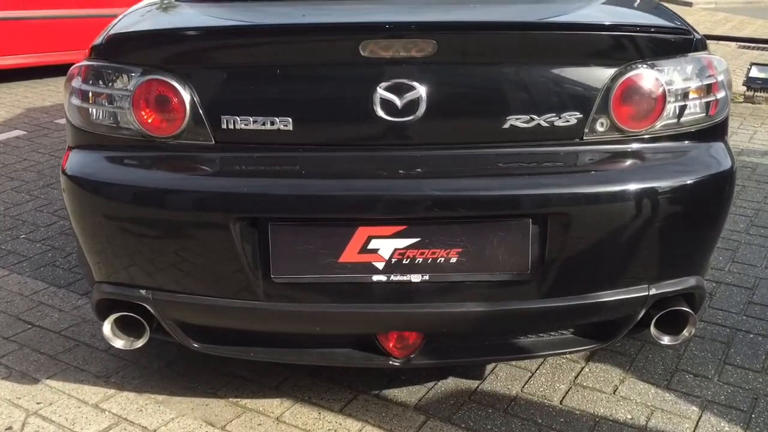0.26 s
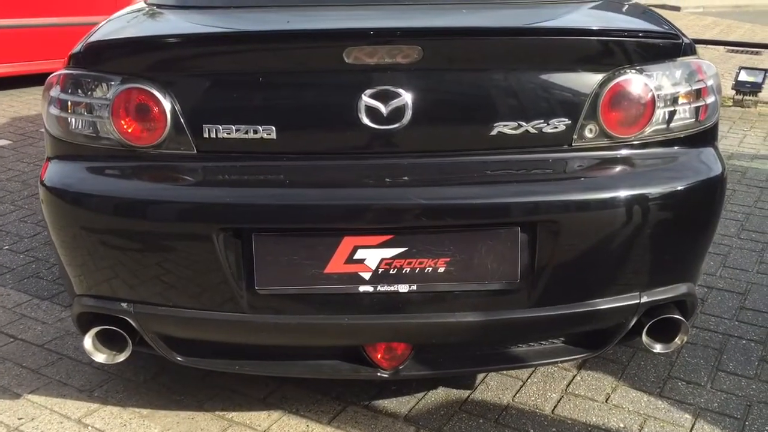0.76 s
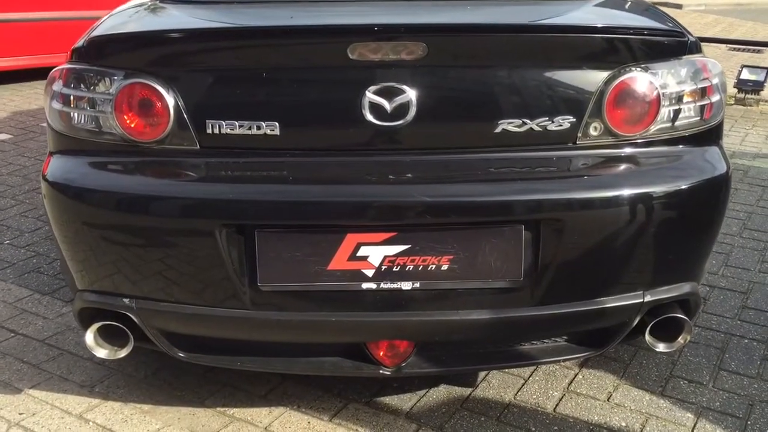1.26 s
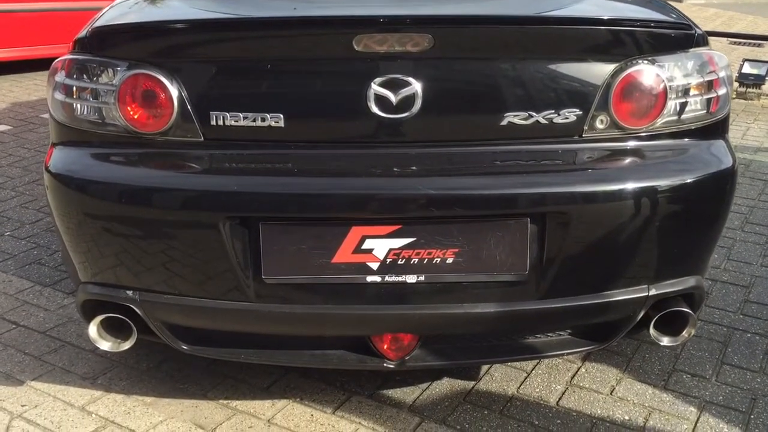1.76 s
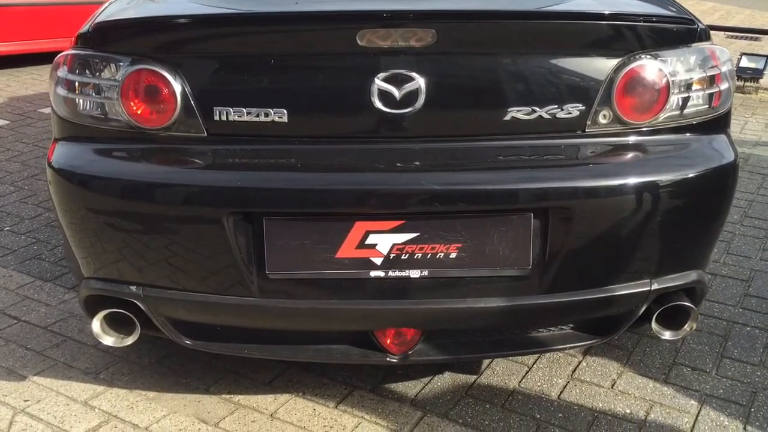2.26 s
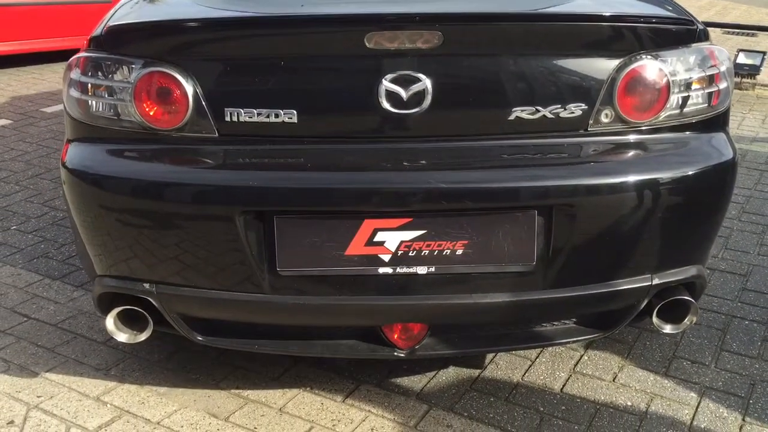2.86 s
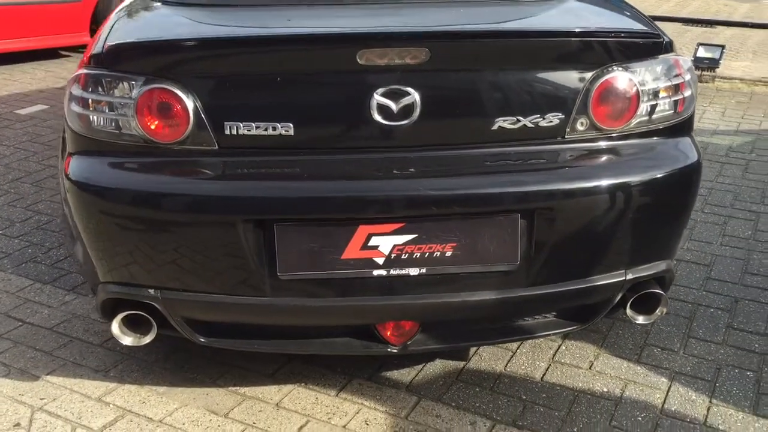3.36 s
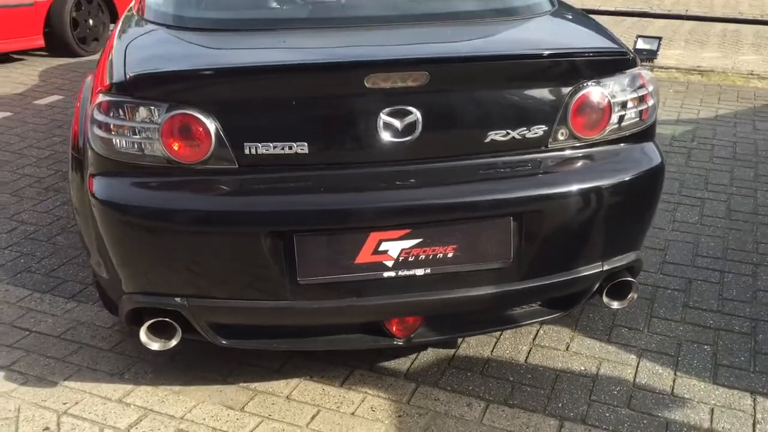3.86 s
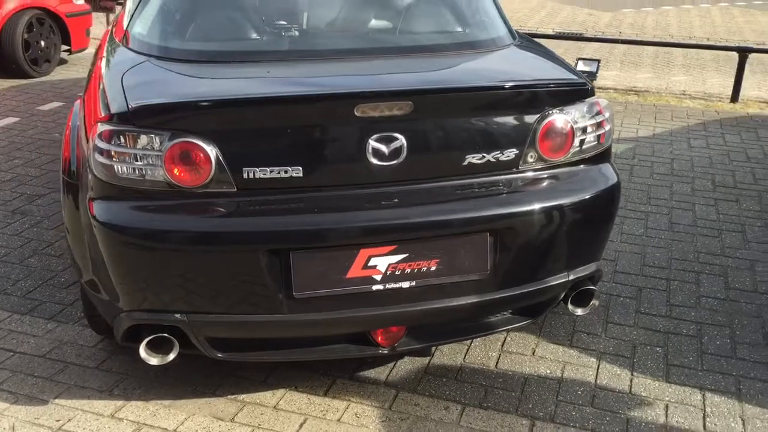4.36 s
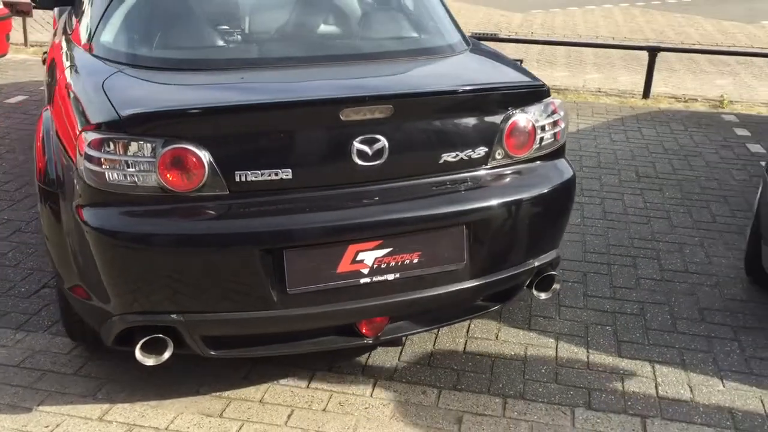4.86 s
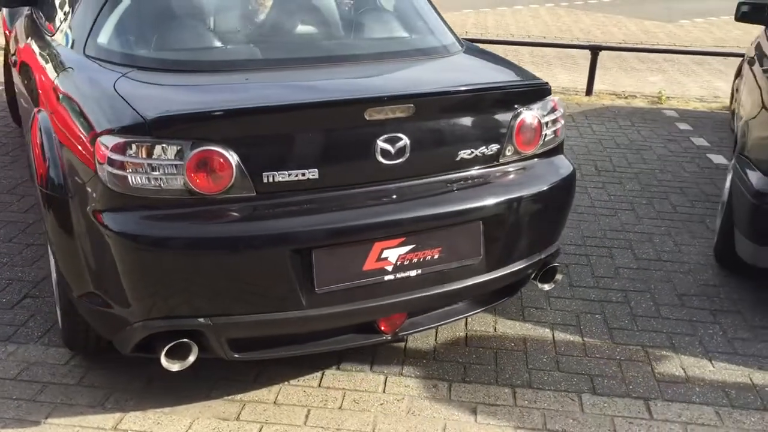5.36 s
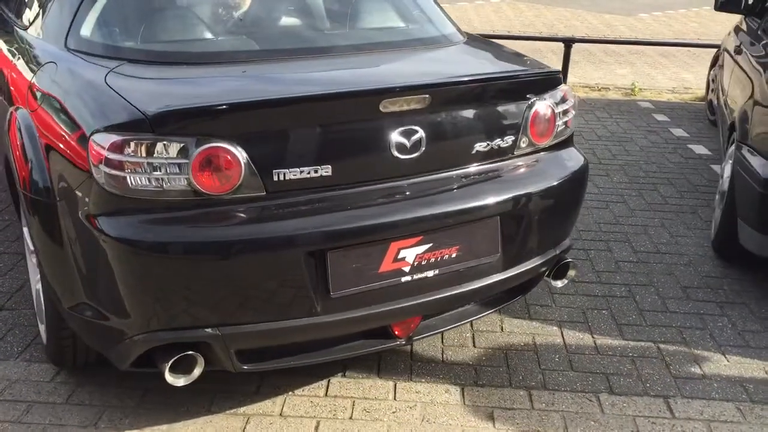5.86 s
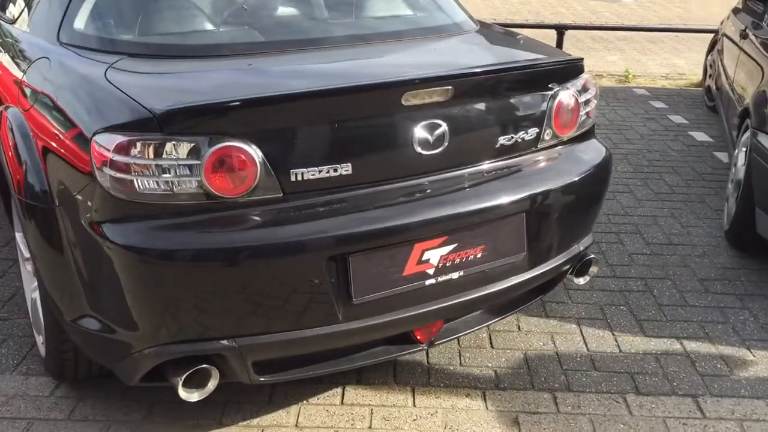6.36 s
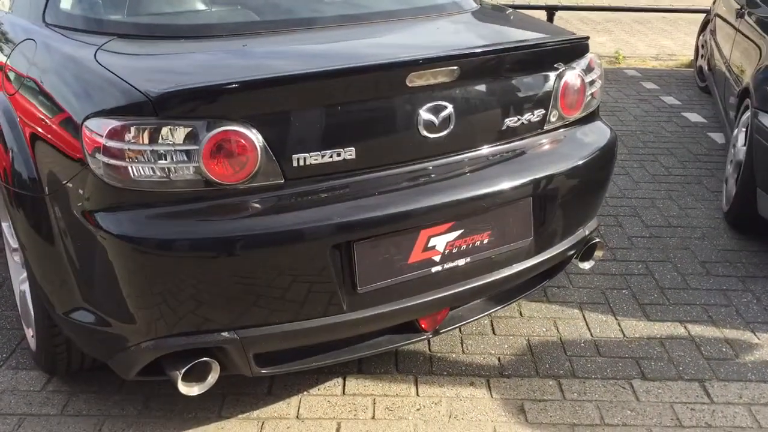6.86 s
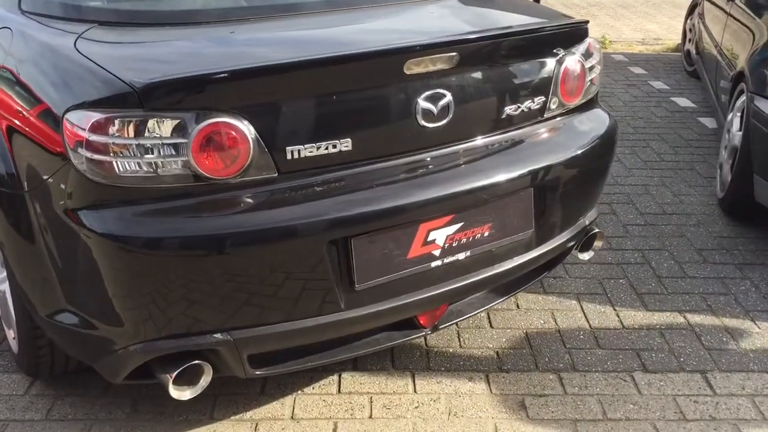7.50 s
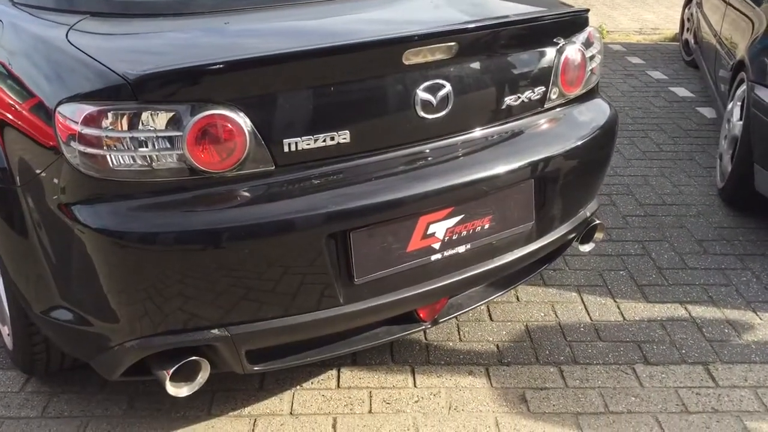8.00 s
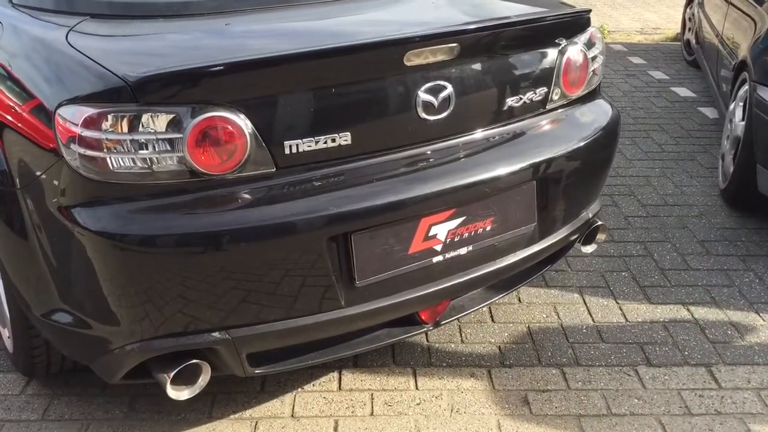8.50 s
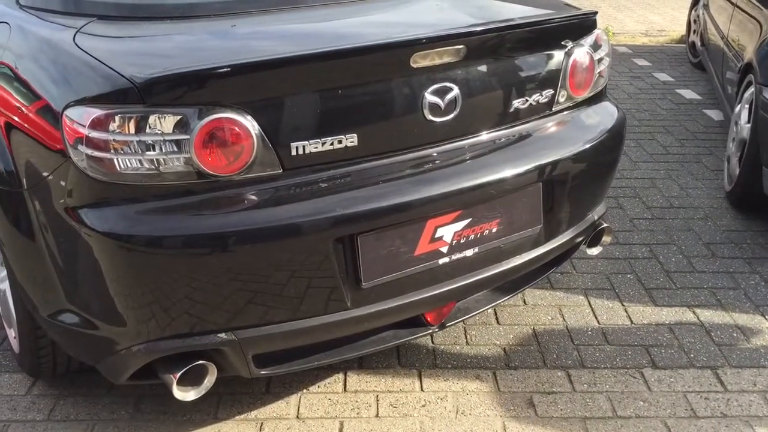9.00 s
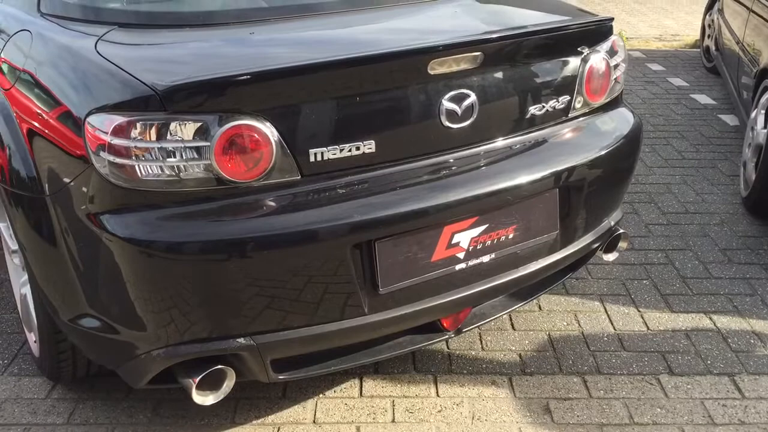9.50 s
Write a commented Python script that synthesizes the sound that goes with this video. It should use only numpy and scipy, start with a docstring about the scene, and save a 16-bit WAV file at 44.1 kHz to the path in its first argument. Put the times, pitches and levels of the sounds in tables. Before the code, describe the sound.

A rotary car engine on an open paved lot, heard dry and near the exhaust as the microphone moves around the tail. Revs drop, then jump twice in quick succession, popping at the lift-offs. The note slides down to a throbbing, uneven idle with mechanical whir and ticking, rises again more gradually to a raspy peak, drops, and is cut off on one last sharp blip.

```python
"""Two-rotor car engine behind the tailpipes

In the open, revs fall, two throttle blips lead to a long coast down to a lumpy idle, then a slow rev
and a last stab. Sine waves at multiples of the firing rate boom in the pipe; clicks through pipe
resonances thump and bark; unburnt fuel pops as ringing bursts; shaped noise and wavering tones make the
engine bay rumble, whir, hiss and tick. A few dry ticks and a faint hiss of open air complete it."""
import sys
import numpy as np
from scipy import signal
from scipy.fft import rfft, irfft, next_fast_len
from scipy.io import wavfile
from scipy.ndimage import uniform_filter1d

SR = 44100
rng = np.random.default_rng(int(sys.argv[2]) if len(sys.argv) > 2 else 0)


def transcribe(u):
    """Save the signal u as a 16-bit wav file named by the first command-line argument.

    u: samples, shape (n,) or (channels, n), limited to [-1, 1]; the rate is SR.
    q: integer samples, one column per channel.
    """
    v = np.clip(np.atleast_2d(u).T, -1, 1)
    q = np.round(v * 32767).astype(np.int16)
    wavfile.write(sys.argv[1], SR, q)


def level_to_linear(level):
    """Convert decibel levels to linear amplitude factors, elementwise."""
    exponent = np.asarray(level, float) / 20
    return 10 ** exponent


N = 429513  # length in samples

# Resonances of the silencer. Each row: pitch in Hz, width in Hz, strength in dB.
SILENCER = [(65, 62, -2.5), (119, 99, 1), (165.3, 16, 5.5), (262, 54, -9.5), (363, 110, -13)]
# Lower resonances of the tailpipe. Each row: pitch in Hz, width in Hz, strength in dB.
TAILPIPE_BODY = [(386, 24, 5), (523, 55, -4), (590, 33, -8.5)]
# Upper resonances of the tailpipe. Each row: pitch in Hz, width in Hz, strength in dB.
TAILPIPE_EDGE = [(680, 370, 17), (925, 200, 6), (1020, 540, -14.5)]
# Silencer and tailpipe against engine speed. Each row: firings per second, thump in dB with the throttle
# shut, thump open, gas rush in dB shut, gas rush open, bark body in dB open, bark edge in dB open.
BY_SPEED = [(30.3, -43, -30, -47, -36, -43, -38), (43, -34.5, 2, -44, -26, -41.5, -57),
            (52.7, -63, -21, -39, -11, -38, -40), (75.4, -43, -36, -55.5, -15.5, -34.5, -37),
            (101, -62, -56, -48, -29.5, -32, -32), (124, -64, -58, -42.5, -50, -27, -24),
            (150, -46, -46, -47.5, -31, -38, -25), (182, -73, -54, -41.5, -31.5, -33, -28.5),
            (205, -54, -48, -40.5, -44, -39, -27.5)]


def evened(x):
    """Scales a sound to rms 1."""
    return x / np.sqrt(np.mean(x ** 2) + 1e-20)


def columns(rows, at=None):
    """Reads each column of a table over time, or over the log of a speed or pitch."""
    start, *rest = np.transpose(rows)
    if at is None:
        at = np.arange(N) / SR
    else:
        start, at = np.log(start), np.log(at)
    return [np.interp(at, start, column) for column in rest]


def read(points, hz):
    """Reads a two-column table on a log axis of pitch or rate."""
    f, value = np.transpose(points)
    return np.interp(np.log(hz + 1), np.log(f + 1), value)


def blend(shut_db, open_db, throttle):
    """A level between the shut and the open throttle."""
    return shut_db + throttle * (open_db - shut_db)


def band(x, lo_hz, hi_hz):
    """Steep filter that keeps the pitches between two limits."""
    limits = [lo_hz, min(hi_hz, .49 * SR)]
    return signal.sosfilt(signal.butter(4, limits, "band", fs=SR, output="sos"), x)


def ring(modes, lo_hz, hi_hz, size=5000):
    """How a pipe with these resonances answers one click: dying sine waves in a pass band, peak 1."""
    t = np.arange(size) / SR
    waves = sum(level_to_linear(db) * w * np.exp(-np.pi * w * t) * np.sin(2 * np.pi * hz * t) for hz, w, db in modes)
    x = band(waves, lo_hz, hi_hz)
    return x / abs(x).max()


def firings(turns, spread_db, weak_db):
    """One click at each whole firing turn, of random size, with weak_db added to every second one."""
    at = np.flatnonzero(np.diff(np.floor(turns)) > 0)
    # a firing between two samples is shared between them
    late = (np.floor(turns[at + 1]) - turns[at]) / (turns[at + 1] - turns[at])
    chance = np.clip(rng.standard_normal(3000)[:len(at)], -2, 2)
    size = level_to_linear(spread_db * chance + weak_db * (np.floor(turns[at]) % 2))
    out = np.zeros(N)
    out[at], out[at + 1] = size * (1 - late), size * late
    return out


def pulses(turns, rate, spread_db, weak_db, pipe):
    """Firing clicks through a pipe, evened so that faster firing is not louder, rms 1 overall."""
    clicks = firings(turns, spread_db, weak_db)
    return evened(signal.oaconvolve(clicks, pipe)[:N] / np.sqrt(rate))


def boom(rate, turns, throttle):
    """Gas pulses in the pipe: clean sine waves at multiples (orders) of the firing rate."""
    # Each row: multiple of the firing rate, phase in turns.
    orders = [(.5, .1), (1, 0), (2, .45), (2.5, .3), (3, .1), (4, .7), (1.5, .2), (5, .35), (6, 0), (7, .6),
              (3.5, .8), (4.5, .55)]
    # Share of each order in the gas pulse, in dB.
    order_db = (-30.5, 0.53, -2.5, -22.5, -4.5, -9, -30, -12.5, -11.5, -15.5, -21.5, -14.5)
    # Change of those shares at idle, in dB.
    order_idle_db = (2, -8, 4, 8.5, -0.2, -2.7, 23, 3.5, -2.5, -3, -8, -7.5)
    # How far each order wavers, some ten times a second, in dB.
    order_flutter_db = (2.5, .9, 2, 3, 2.5, 2.5, 3, 2.5, 2.5, 2.5, 3, 3)
    # Strength of the gas pulses; it sinks at idle and dips at lift-off. Each row: time in seconds, dB.
    gas = [(0, 4.5), (.6, -5), (.65, -8), (.84, -5.5), (.9, -9), (.97, 1), (1.57, 0.5), (1.62, -6),
           (1.66, -4.5), (1.98, -4.5), (2.1, 4.5), (2.19, -2), (2.27, 0), (2.31, 1), (2.55, -0.5),
           (2.72, -.5), (3.7, 0.8), (4.6, -2), (4.7, -13), (4.9, -21.5), (6.45, -17), (6.66, -3), (6.8, -2),
           (7.1, -7), (7.5, 1.8), (8.25, -0.5), (8.3, -12.5), (8.37, -1), (8.48, 1), (9, 0.5), (9.63, 0),
           (9.685, -1.5), (9.71, 9.5), (9.74, -4)]
    # What the pipe lets out. Each row: pitch in Hz, dB with the throttle shut, dB with it open.
    pipe = [(15, -46, -39), (33, -37, -36), (42.3, -20, -21.5), (53.3, -21, -13), (65.6, -23, -13),
            (71.5, -26.5, -22), (93.5, -17.5, -13.5), (99, -16, -13), (108.7, -21, -14.5), (146, -21, -13),
            (169.8, -19.5, -16), (180.4, -26.5, -11.5), (210.6, -34, -23.5), (250, -41.5, -21.5),
            (387, -43, -25), (445, -45.5, -26.5), (520, -51, -20), (617, -48.5, -23.5), (740, -52.5, -27.5),
            (960, -60, -26), (1190, -60, -38), (1400, -66, -48.5)]
    # Levels as the microphone walks round the tail. Each row: time in seconds, whole orders above the
    # first in dB, half orders in dB.
    overtones = [(0, -3.5, -3), (.5, 0.2, -5), (.9, 2.3, -2), (.97, 3.5, 5), (1.05, 2.5, 2.5),
                 (1.2, 0.6, 6), (1.35, -1.5, 3), (1.6, -1.7, 6), (2, 4, 7.5), (2.2, -2.5, 6.5),
                 (2.5, -7.5, -3), (2.9, 4, 10), (3.5, -1.5, 0), (4, 0.3, -5), (4.6, -2.9, 2.5),
                 (6.6, -0.5, -2), (7.2, 3, 10.5), (7.5, -4, -1), (7.8, 7, 12), (8.2, 1.5, 5.5),
                 (8.6, -3, 1.5), (9.1, -6, .4), (9.6, -7.5, -6), (9.74, -3, 12)]
    gas_db, = columns(gas)
    upper_db, half_db = columns(overtones)
    idle = np.clip((44.5 - rate) / 3, 0, 1)  # sets in below 44.5 firings per second, full 3 lower
    slow = rng.standard_normal((len(orders), N // 50 + 1))  # one value per 50 samples
    slow = uniform_filter1d(uniform_filter1d(slow, size=30), size=30)
    out = np.zeros(N)
    for (k, phase), db, idle_db, flutter_db, v in zip(orders, order_db, order_idle_db, order_flutter_db, slow):
        sway = np.interp(np.arange(N) / 50, np.arange(len(v)), evened(v))
        walk_db = half_db if k % 1 else upper_db * (k > 1)
        pipe_db = blend(*columns(pipe, k * rate), throttle)
        level_db = pipe_db + gas_db + db + idle_db * idle + walk_db + flutter_db * sway
        out += np.sqrt(2) * level_to_linear(level_db) * np.cos(2 * np.pi * (k * turns + phase))
    # at idle all orders lope together
    lope = evened(uniform_filter1d(uniform_filter1d(rng.standard_normal(N), size=900), size=500))
    return out * level_to_linear(2.5 * idle * lope)


def thump_and_rush(rate, turns, throttle):
    """Silencer: uneven firing clicks make it thump, steady noise through it is the rush of gas."""
    thump_shut, thump_open, rush_shut, rush_open, _, _ = columns(BY_SPEED, rate)
    thump = pulses(turns, rate, 3.2, -0.46, ring(SILENCER, 39, 219))
    rush = evened(signal.oaconvolve(rng.standard_normal(N), ring(SILENCER, 72.6, 383))[:N])
    thump = level_to_linear(blend(thump_shut, thump_open, throttle)) * thump
    return thump + level_to_linear(blend(rush_shut, rush_open, throttle)) * rush


def bark(rate, turns, throttle):
    """Open throttle: sharp firing pulses ring the tailpipe, one rotor louder than the other."""
    # The two colours lead in turn. Each row: time in seconds, body in dB, edge in dB.
    bark_levels = [(0, .4, 2), (.95, -3, -4), (1.05, -8, 3), (1.18, -13, 6), (1.32, 1, 3.5),
                   (1.42, -6, -1.5), (1.55, 0, -2), (2.04, -8, 3), (2.12, 1, 5), (2.26, -2, 1.5),
                   (3, -5, -1.5), (6.6, -4, 1), (7.1, 14, -2), (7.35, 16.5, -5), (7.6, 4, 8), (7.8, 9, 6),
                   (7.95, 10, 0.5), (8.22, 13, 5), (9, -7, 7), (9.74, 9, 10)]
    body_db, edge_db = columns(bark_levels)
    *_, body_open, edge_open = columns(BY_SPEED, rate)
    early = turns + .3  # firing turns ahead of the thump
    body = pulses(early, rate, .8, -6, ring(TAILPIPE_BODY, 240, 1000))
    edge = pulses(early, rate, .8, -14, ring(TAILPIPE_EDGE, 686, 1080))
    opening = np.sqrt(throttle)
    body = level_to_linear(blend(-65.5, body_open + body_db, opening)) * body
    return body + level_to_linear(blend(-78, edge_open + edge_db, opening)) * edge


def pops():
    """Afterfires of unburnt fuel: each thumps the silencer and cracks the tailpipe with a spray of noise."""
    # Each row: start in seconds, thump level in dB, crack level in dB.
    afterfires = [(1.604, -18.5, -70), (2.0009, -7, -4), (2.285, -16, -39), (2.444, -18.5, -50),
                  (2.472, -26.5, -59), (5.536, -28, -56), (8.391, -14, -60), (8.412, -32, -39),
                  (9.6938, -3.5, -13.5), (9.7, -11, -3), (9.7044, -6, -0.5)]
    thump, crack = np.zeros((2, N))
    for s, thump_db, crack_db in afterfires:
        thump[round(s * SR)], crack[round(s * SR)] = level_to_linear(thump_db), level_to_linear(crack_db)
    t = np.arange(5000) / SR
    spray = signal.lfilter([1], [1, -.7], rng.standard_normal(5000))  # duller than plain noise
    spray = spray * level_to_linear(-32.5 - 60 * t / 0.056)  # fades by 60 dB in 0.056 s
    shot = spray - ring(TAILPIPE_BODY + TAILPIPE_EDGE, 200, 1100)
    thump = signal.oaconvolve(thump, ring(SILENCER, 58, 340))[:N]
    return thump + signal.oaconvolve(crack, shot)[:N]


def noise(spectra, patchy_db=1.5):
    """One random noise with drifting patches, coloured by ringing panels and by each spectrum, rms 1."""
    # Panels and shields that the noise sets ringing. Each row: pitch in Hz, width in Hz, dB over
    # their surroundings.
    panels = [(1142, 9.2, 11), (1487, 13, 7.5), (2446, 22, 6), (3200, 22, 7.5), (5230, 14, 12.5),
              (6060, 70, 2), (7800, 60, -3.5), (9740, 79, 0), (11400, 120, 9)]
    size = next_fast_len(N)
    frames, fine = N // 128 + 8, np.fft.rfftfreq(size, 1 / SR)
    a, b, patches = rng.standard_normal((frames, 257, 3)).T
    patches = evened(uniform_filter1d(uniform_filter1d(patches, 4, 0), 24, 1))
    patchy = (a + 1j * b) * level_to_linear(patchy_db * patches)
    white = rfft(signal.istft(patchy, nperseg=512, noverlap=384)[1][:N], size)
    white *= 1 + sum((level_to_linear(db) - 1) / (1 + (2 * (fine - f) / w) ** 2) for f, w, db in panels)
    return [evened(irfft(white * level_to_linear(read(s, fine)), size)[:N]) for s in spectra]


def whines(rate, turns):
    """Belt-driven rotors: two tones that follow the firing rate while pitch and level waver."""
    # Pitch of each whine as a multiple of the firing rate.
    whine_orders = (12, 17.4)
    # How each whine stands out as it sweeps through the resonances of the bay. Each row: firings per
    # second, first whine in dB, second in dB.
    whine_resonance = [(32, -28, -18), (36, -28, -8), (40, -28, -2.5), (44, -28, -6), (58, -27, -9),
                       (75, -25, -5), (88, -24, -4), (103, -18, -9), (117, -4, -13), (129, -5, -9),
                       (147, -9, -15), (160, -6, -18), (172, 3, -20), (188, -5, -26), (206, 1, -27)]
    # Level changes over time. Each row: time in seconds, first whine in dB, second in dB.
    whine_levels = [(0, -9, -9), (.5, -9, -4), (.9, -9, -4), (1, -14, -18), (1.56, -12, -18),
                    (1.62, 1, -18), (1.97, -4, -18), (2.05, -14, -18), (2.25, -12, -18), (2.32, -3, -16),
                    (2.55, -6, -16), (2.75, -1, -14), (3.3, -3, -4), (3.9, -3, -10), (4.5, -3, -10),
                    (4.65, -3, 0), (5.1, -3, 1), (5.4, -3, -9), (6.6, -3, -6), (6.78, -3, 6), (6.95, -3, 5),
                    (7.25, -6, 5), (7.5, -6, -9), (8.2, 1, -14), (8.9, 3, -9), (9.74, 0, -9)]
    out = np.zeros(N)
    for multiple, db, level_db in zip(whine_orders, columns(whine_resonance, rate), columns(whine_levels)):
        drift, swell = (evened(uniform_filter1d(v, 500)) for v in rng.standard_normal((2, N)))
        tone = np.sin(2 * np.pi * (multiple * turns + np.cumsum(19 * drift) / SR))  # wavers by 19 Hz rms
        out += np.sqrt(2) * level_to_linear(db + level_db + 3.5 * swell) * tone
    return out


def hiss(rate, throttle, whir_db, coast, jet):
    """A dull hiss with the throttle shut turns towards a bright, louder and gusty one as it opens."""
    # Level relative to the whir. Each row: firings per second, dB.
    hiss_over_whir = [(32, -28), (38, -18.5), (45, -11.5), (70, -9), (120, -9), (165, -9), (210, -7)]
    # Level as the microphone walks round the tail. Each row: time in seconds, dB.
    hiss_level = [(0, -1), (.9, 0.5), (1.3, 1), (1.7, 1.5), (2.2, 0.5), (2.6, 2), (3.5, 2.5), (4.3, -1.6),
                  (5.2, 0.8), (6.5, -2.5), (7.2, -4), (7.9, -3), (8.4, 2), (9.74, -0.3)]
    gust_db = 1.5 * evened(uniform_filter1d(rng.standard_normal(N), size=900))
    lift_db = (13 * throttle + gust_db) * throttle
    bright = np.clip(.55 * throttle, 0, 1)
    level_db = whir_db + read(hiss_over_whir, rate) + columns(hiss_level)[0] + lift_db
    return level_to_linear(level_db) * ((1 - bright) * coast + bright * jet)


def injectors(rate, turns):
    """Two injectors tick in turn, each once every two firings: noise that dies away after each tick."""
    # One band for each rotor. Each row: lowest pitch in Hz, highest pitch in Hz.
    injector_hz = [(7600, 10300), (11600, 15000)]
    # Each row: time in seconds, level in dB.
    injector_db = [(0, -83), (4, -82), (5.2, -77), (9.74, -76)]
    tick = np.zeros(N)
    for k, hz in enumerate(injector_hz):
        since = ((turns + k) / 2 % 1) * 2 / rate  # seconds since the last tick
        tick += evened(band(np.exp(-since / .011) * rng.standard_normal(N), *hz))
    return level_to_linear(columns(injector_db)[0]) * tick


def engine_bay(rate, turns, throttle):
    """Rumble, whir with whines, and hiss, which grow with throttle; whir and hiss pulse with the firings."""
    # Colours of the four noises. Each row: pitch in Hz, relative level in dB per Hz.
    rumble_colour = [(240, -5.5), (400, -10), (654, -6.5), (908, -5.5), (999, -6.5), (1070, -3),
                     (1160, -13), (1250, -10), (1620, -22), (2750, -120)]
    whir_colour = [(680, -31), (1150, -20.5), (1300, -7), (1550, 0), (1770, -0.5), (2100, 2), (2400, -1.5),
                   (2910, -9.5), (3240, -15.5), (4200, -21), (5460, -38.5), (9240, -120)]
    coast_colour = [(2060, -25.5), (3500, -5.5), (4300, -8.5), (4840, -13.5), (5280, -11.5), (6370, -14.5),
                    (7220, -21), (8980, -22.5), (9740, -18), (10600, -27), (11800, -24.5), (13900, -26),
                    (15600, -27)]
    jet_colour = [(2060, -34.5), (3500, -11.5), (3820, -8.5), (4900, -1.5), (5350, -10), (6290, 5),
                  (7270, -2), (9560, -3), (10600, -8), (11700, -9.5), (15600, -1.5)]
    # Levels with the throttle shut. Each row: time in seconds, rumble in dB, whir in dB.
    bay = [(0, -46.5, -48), (.45, -49, -52.5), (.9, -44, -50), (1.4, -42, -52), (1.62, -53, -54),
           (1.96, -55, -53.5), (2.34, -46.5, -52), (2.75, -51, -50), (3.5, -44.5, -46), (4.1, -47, -47.5),
           (4.65, -48.5, -53.5), (5.25, -42.5, -49.5), (5.55, -43, -54), (5.8, -47.5, -54), (6.5, -46, -54),
           (7, -40.5, -45.5), (7.6, -39.5, -43), (8.3, -39, -41.5), (8.9, -43.5, -41), (9.3, -45.5, -43.5),
           (9.74, -43.5, -46)]
    rumble, whir, coast, jet = noise([rumble_colour, whir_colour, coast_colour, jet_colour])
    rumble_db, whir_db = columns(bay)
    whir = whir * level_to_linear(10.5 * throttle ** 2) + whines(rate, turns)
    gate = 1 + .06 * throttle * np.cos(2 * np.pi * (turns - .6))
    gated = gate * (level_to_linear(whir_db) * whir + hiss(rate, throttle, whir_db, coast, jet))
    return level_to_linear(rumble_db + 6 * throttle ** 2) * rumble + gated + injectors(rate, turns)


def ticks():
    """Small dry ticks nearby: short fading noise bursts around a centre pitch."""
    # Each row: start in seconds, rough peak in dB, centre pitch in Hz.
    dry_ticks = [(4.902, -47, 7500), (4.919, -45, 7000), (5.277, -38, 3200), (5.794, -42.5, 6960),
                 (5.814, -49, 6000), (6.273, -49, 11100)]
    out, t = np.zeros(N), np.arange(1500) / SR
    for s, db, hz in dry_ticks:
        burst = evened(band(rng.standard_normal(1500), 0.66 * hz, 1.35 * hz))
        out[round(s * SR):][:1500] += burst * level_to_linear(db - 11.0 - 60 * t / 0.061)  # loses 60 dB in 0.061 s
    return out


def open_air():
    """Faint steady hiss of open air: high-pitched noise."""
    return level_to_linear(-75.5) * evened(band(rng.standard_normal(N), 5000, 15700))


def scene():
    """Speed and throttle drive every part of the car, over the open air."""
    # Engine speed. Each row: time in seconds, firings per second.
    speed = [(0, 70.5), (.3, 55.8), (.49, 45.9), (.57, 44.2), (.65, 42.8), (.89, 42.5), (.95, 47.4),
             (1.03, 57.9), (1.11, 75), (1.25, 103.8), (1.35, 129.6), (1.52, 168.4), (1.57, 178.7),
             (1.6, 180.1), (1.68, 173.3), (1.95, 159.4), (2, 155.9), (2.06, 163.7), (2.11, 173.9),
             (2.19, 195.9), (2.27, 210), (2.3, 210), (2.62, 184.2), (2.76, 170.9), (3.3, 128.9),
             (3.89, 88.4), (4.57, 45.2), (4.62, 42.7), (4.73, 40.1), (4.98, 39.5), (5.65, 32.2),
             (5.9, 32.3), (6.44, 35.5), (6.55, 39.1), (6.66, 46.5), (6.76, 56.7), (6.92, 72.5), (7.03, 80),
             (7.36, 95.3), (7.57, 111.2), (7.71, 125), (7.9, 141.2), (8.14, 158), (8.25, 163.6),
             (8.3, 164.2), (8.47, 154.8), (8.87, 129.9), (9.49, 94.3), (9.63, 88.1), (9.69, 87), (9.74, 90)]
    # Each row: time in seconds, throttle opening from 0 to 1.
    throttle_opening = [(0, 0), (.9, 0.22), (.97, 0.79), (1.3, 0.93), (1.56, .9), (1.61, 0.12), (1.985, 0),
                        (2.01, 0.61), (2.11, 0.89), (2.26, 0.87), (2.3, 0), (6.5, 0), (6.7, 0.45),
                        (7, 0.19), (7.4, 0.34), (7.65, 0.54), (7.85, 0.58), (8.25, 0.46), (8.31, 0.31),
                        (9.685, 0), (9.71, .98), (9.74, 0.78)]
    rate, = columns(speed)
    throttle = np.clip(columns(throttle_opening)[0], 0, 1)
    turns = np.cumsum(rate) / SR  # firings so far
    exhaust = boom(rate, turns, throttle) + thump_and_rush(rate, turns, throttle) + bark(rate, turns, throttle)
    car = exhaust + pops() + engine_bay(rate, turns, throttle) + ticks()
    return (car + open_air())[None]


def band_limit(x):
    """A steep low-pass at the top of the band."""
    return signal.sosfilt(signal.butter(12, 15710, fs=SR, output="sos"), x)


def record(dry):
    """The microphone drops the deepest bass, below 30 Hz, and rounds off the loudest peaks."""
    cut = signal.sosfilt(signal.butter(3, 30, "high", fs=SR, output="sos"), dry)
    soft = cut / (1 + abs(cut / .72) ** 8) ** (1 / 8)  # peaks level off at .72
    return band_limit(soft)


dry = scene()
out = record(dry)
transcribe(out)
```